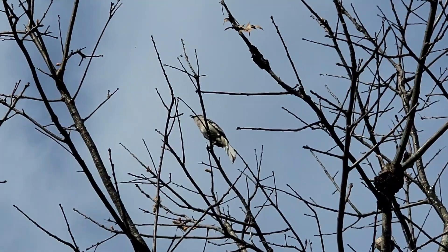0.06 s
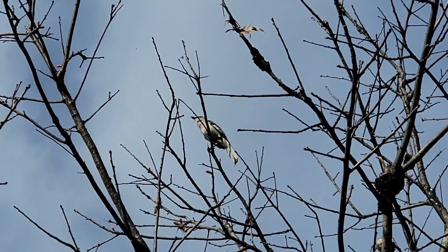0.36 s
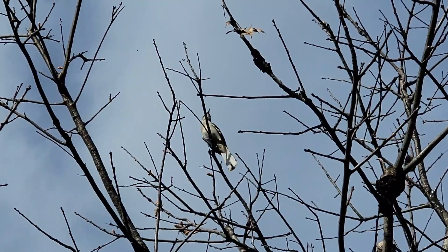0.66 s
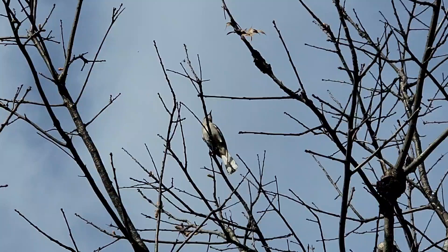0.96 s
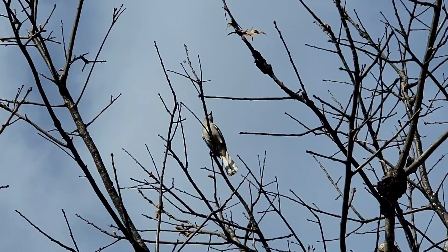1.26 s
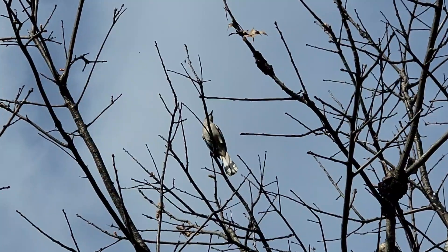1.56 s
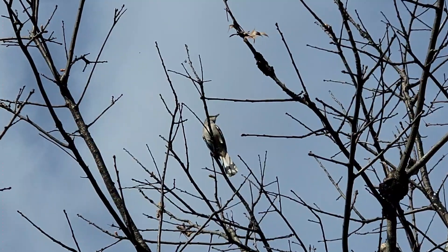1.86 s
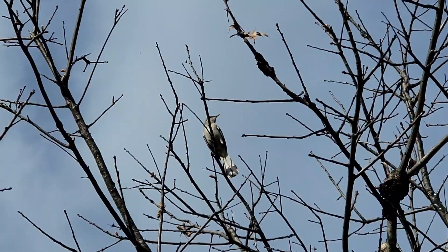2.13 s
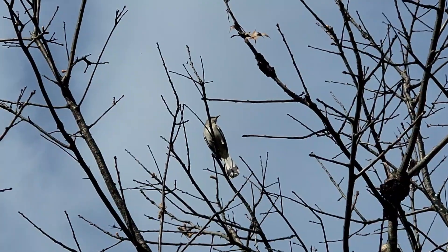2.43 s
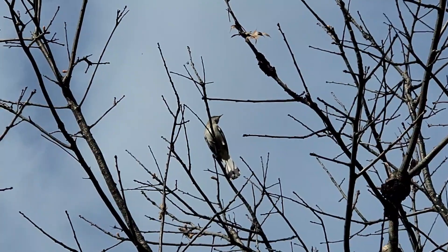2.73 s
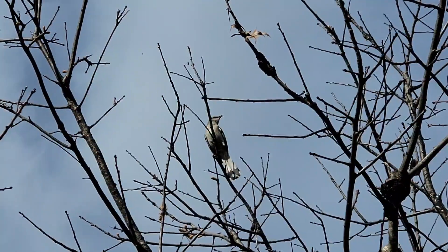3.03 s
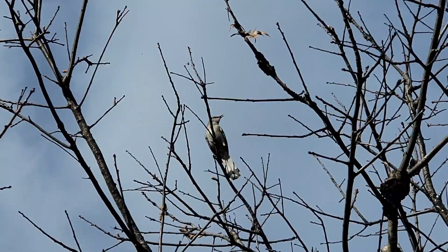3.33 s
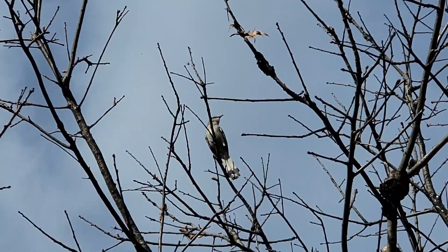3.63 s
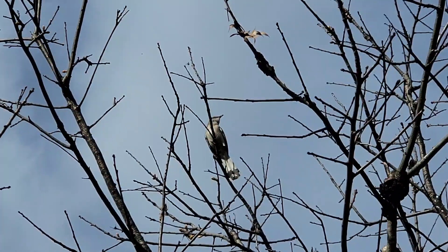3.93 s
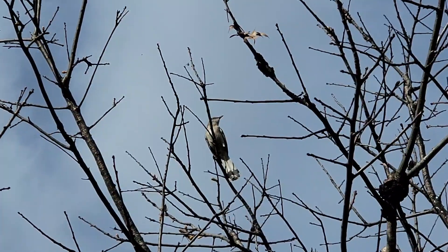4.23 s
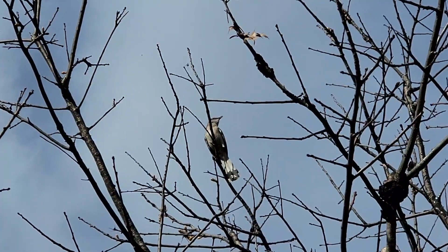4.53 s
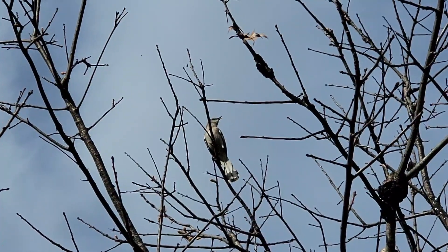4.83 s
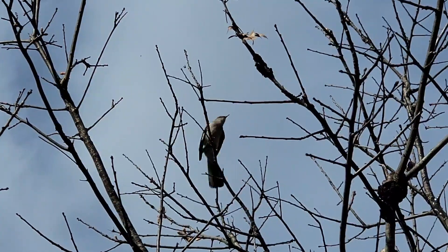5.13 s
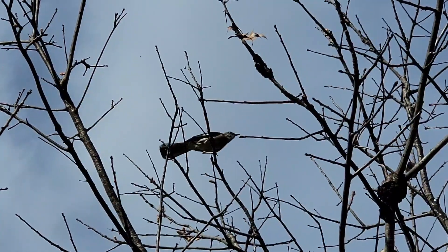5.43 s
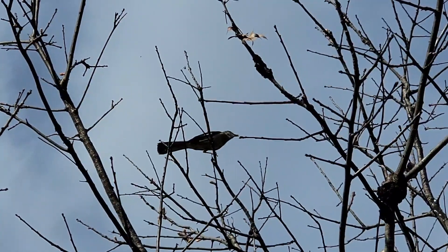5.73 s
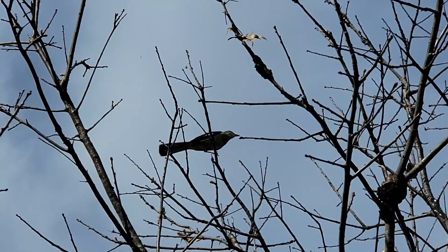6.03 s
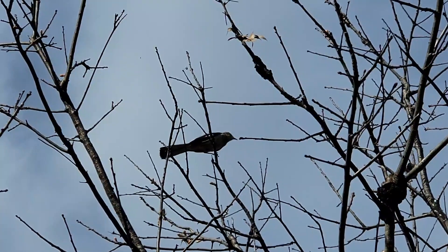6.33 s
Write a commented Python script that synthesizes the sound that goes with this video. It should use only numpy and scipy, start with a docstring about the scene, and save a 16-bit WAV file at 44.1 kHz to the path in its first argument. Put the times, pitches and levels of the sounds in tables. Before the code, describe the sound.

Outdoors, a mockingbird repeats gliding whistles and raspy chips with brief pauses, while a far bird answers above low traffic noise.

```python
"""Mockingbird in a bare tree

Close to a stereo microphone, a mockingbird sings three phrases, repeating each before the next.
Membranes in its syrinx make gliding whistles, some torn into a rasp as they turn chaotic;
a hard surface nearby throws the notes back a moment later. A second bird answers faintly
from afar, over the low rumble of distant traffic, two machine tones and a hiss of air."""
import sys
import numpy as np
from scipy import signal
from scipy.fft import rfft, irfft, next_fast_len
from scipy.io import wavfile
from scipy.ndimage import uniform_filter1d, minimum_filter1d, map_coordinates

SR = 44100
rng = np.random.default_rng(int(sys.argv[2]) if len(sys.argv) > 2 else 0)


def master(y):
    """Save y as 16-bit WAV."""
    cut = np.clip(np.atleast_2d(y).T, -1, 1)
    pcm = np.round(cut * 32767)  # scale
    wavfile.write(sys.argv[1], SR, pcm.astype(np.int16))


N = 281799

# Spectra of far traffic and open air: (frequency [Hz], relative density [dB])
TRAFFIC_SPECTRUM = [(13, -28.5), (22, -13.5), (59, 5.5), (83, 3.5), (107, 0), (145, 0), (368, -12),
                    (432, -16.5), (490, -13), (536, -11), (630, -19.5), (1080, -20), (1410, -27),
                    (1600, -45.5), (2080, -57), (3520, -120)]
AIR_SPECTRUM = [(900, -22), (1400, 1), (1700, -8), (2300, -2), (2800, -5), (3100, -3.5), (3500, -8.5),
                (4300, -8.5), (5300, -24.5), (6600, -30), (9000, -45), (11000, -43), (12200, -30.5),
                (15500, -36.5)]
# How alike that noise is at the two microphone ports: (frequency [Hz], correlation [0-1])
PORT_LIKENESS = [(60, 0.95), (130, 0.98), (290, 0.92), (640, 0.8), (1410, 0.3), (3100, 0.14), (6820, 0.03),
                 (15000, 0.02)]
# Distant machine tones: (frequency [Hz], level [dB])
MACHINE_TONES = [(438, -52.5), (545, -52)]

# The near bird's syllables, one note a row: (delay [s], length [s], pitch at start [Hz],
# at one third [Hz], at two thirds [Hz], at end [Hz], level [dB], swell [dB], attack [s],
# release [s], roughness [0-1], overtone gain [dB], even overtone gain [dB])
RISE_NOTES = [(0, 0.081, 1900, 1935, 1990, 2174, -22.5, 11, 0.024, 0.024, 0.093, -4.5, -6)]  # soft rising whistle
SWOOP_NOTES = [(.002, .034, 3985, 3346, 3110, 2840, -12.5, 0, 0.011, 0.016, .12, 3.5, -0.36),
               (.026, .1, 2884, 2673, 2437, 2060, -25.5, -9, .005, 0.046, .1, -6.5, -2)]  # loud fall that trails away
WARBLE_NOTES = [(.002, 0.057, 2846, 2882, 2560, 2400, -18.5, -5, .016, 0.011, 0.19, -1.2, -4),
                (.058, .043, 2170, 2167, 2380, 2624, -22.5, 8, .004, 0.0042, 0.17, 1.2, -6),
                (.096, .028, 2350, 1950, 1730, 1570, -29.5, -21, .004, 0.0066, 0.23, -1, 3)]  # slur down, climb, drop off
HOLD_NOTES = [(0, .074, 1680, 1660, 1660, 1675, -36.5, 3, .008, .012, .03, -16, 8)]  # quiet level tone
CREAK_NOTES = [(0.0016, .042, 1880, 2180, 2370, 2560, -26, 3.3, 0.027, 0.025, .6, 3.5, -3.1)]  # period-doubled lead-in
ARCH_NOTES = [(0.0015, 0.09, 1740, 2070, 2065, 1680, -23.5, 0, 0.027, 0.012, 0.1, -4, -1.3)]  # low rounded whistle
FLOURISH_NOTES = [(.002, .032, 3120, 3100, 3275, 3380, -19, 8, .016, 0.0062, .08, 2, -0.5),
                  (.0345, 0.027, 3710, 3133, 2832, 2670, -12.5, -9, 0.0035, .01, .2, 4, 0.5),
                  (.055, 0.12, 2124, 1910, 1888, 1802, -30.5, -10, 0.023, 0.016, 0.037, -1, -7),
                  (.177, .043, 2470, 2330, 2170, 2030, -23.5, 0, 0.011, 0.0055, 0.22, -3.5, 0.5),
                  (.221, .045, 2620, 2357, 2642, 2800, -20.5, 10, 0.0038, 0.0078, 0.37, -0.5, -1)]  # lift, whip down, low whine, dip, twirl
# When each is sung: (time [s], time stretch [ratio], pitch [ratio], gain [dB])
RISE_TIMES = [(-.0185, 0.89, 1.055, 0), (0.2958, 1.025, 1.012, 1.2), (.657, 1.174, 1.001, 0.3),
              (1.039, 1.08, 1.004, 0), (1.5473, 1.006, 1.015, 0), (1.904, 1.24, 1.007, .5)]
SWOOP_TIMES = [(0.064, 1, 1.001, .1)]
WARBLE_TIMES = [(0.407, 0.98, 0.99, 0.38), (0.7812, 0.97, .99, .1), (1.151, 0.99, 1, 0.15),
                (1.6537, 1.003, 1.01, 0.6), (2.0322, 1, 1.003, -1.1)]
HOLD_TIMES = [(0.513, 0.987, 1.001, .1)]
FLOURISH_TIMES = [(5.453, 0.94, 0.98, 0.08), (5.78, 0.99, 1, 0.41), (6.134, .99, .98, -1)]
# Arches, flatter as the phrase settles: (time [s], time stretch [ratio], height [ratio], gain [dB])
ARCH_TIMES = [(2.926, 0.87, 1.52, -.5), (3.2589, 0.99, 1.26, 0.8), (3.6153, 0.95, 0.87, -.7),
              (3.9717, 0.96, 0.96, -0.4), (4.356, 0.96, 1.03, .1), (4.738, 1.025, 0.98, .6)]
# Piercing chips: (time [s], length [s], top pitch [Hz], rasp pitch [Hz], fall time [s], level [dB])
TORN_CHIPS = [(3.084, 0.14, 3518, 2750, 0.022, -7), (3.43, 0.14, 3127, 2410, .035, -8.5),
              (3.78, 0.14, 3077, 2366, .034, -9), (4.154, 0.14, 3130, 2360, .034, -9.5),
              (4.547, 0.14, 3087, 2382, .035, -8.5), (4.929, 0.15, 3062, 2398, .036, -9)]
# The far bird's slurs: (time [s], length [s], start pitch [Hz], end pitch [Hz], level [dB])
DISTANT_SLURS = [(.248, 0.043, 3400, 2280, -42), (0.296, .045, 5160, 3000, -49),
                 (0.379, 0.035, 2700, 3100, -42), (0.884, 0.17, 5425, 5520, -71.5),
                 (1.342, 0.034, 3400, 2280, -41.5), (1.396, 0.022, 3250, 2380, -48),
                 (1.468, .08, 2430, 2226, -46), (2.534, .085, 3460, 3060, -46.5),
                 (2.683, 0.062, 2237, 2740, -46.5), (2.729, 0.067, 2310, 2395, -52),
                 (3.745, .045, 3400, 2210, -43), (4.274, .042, 3380, 2280, -38),
                 (4.327, .04, 3200, 2230, -44), (5.309, .05, 3310, 2220, -43.5),
                 (5.574, 0.034, 5250, 2960, -52), (6.067, .036, 5100, 2980, -47.5)]
# Colour of the overtones as heard, with the microphone's peak near 14 kHz and roll-off above it:
# (frequency [Hz], gain [dB])
OVERTONE_COLOUR = [(3300, -22.5), (4100, -20.5), (4900, -17), (5400, -28.5), (5900, -41.5), (6900, -34.5),
                   (8300, -45.5), (10500, -41.5), (12000, -37.5), (13300, -29.5), (14000, -24.5),
                   (14600, -37.5), (15300, -49)]

# The near bird's strength at the microphone: (frequency [Hz], left minus right [dB])
PORT_BALANCE = [(1800, 3.5), (2400, 2), (2900, -7.5), (3600, -5.5), (5000, -10.5), (8000, 7), (14000, 3)]
# Its phase at the microphone: (frequency [Hz], lead of the left port [rad])
PORT_PHASE = [(800, -.1), (2000, -.6), (2650, -1.45), (3000, -.8), (4000, 0), (4600, 1), (5500, 1.4),
              (7000, .3), (8900, .4), (10000, -.8), (11400, -1.6), (12500, .3), (15000, -.6)]
# The garden's reverberation: (frequency [Hz], time to fall 60 dB [s])
GARDEN_DECAY = [(1500, .5), (3000, 0.7), (6000, 0.37), (14000, 0.54)]


def amp(db):
    """Decibels to gain."""
    return 10 ** (np.asarray(db) / 20)


def along(points, hz):
    """Read (frequency, value) points on a log axis."""
    freqs, values = np.transpose(points)
    return np.interp(np.log(hz + 1), np.log(freqs + 1), values)


def wobble(rate, size):
    """A smooth random curve, rate knots a second."""
    knots = rng.standard_normal(int(size * rate / SR) + 4)
    return map_coordinates(knots, [np.arange(size) * rate / SR])


def filtered(x, response):
    """Pass x through a complex frequency response."""
    size = next_fast_len(N + SR // 2)
    return irfft(rfft(x, size) * response(np.fft.rfftfreq(size, 1 / SR)), size)[..., :N]


def add(out, start, sound):
    """Mix a sound into out at start seconds."""
    at = round(start * SR)
    sound = sound[:, max(-at, 0):N - at]
    out[:, max(at, 0):][:, :sound.shape[1]] += sound


def envelope(t, attack_s, release_s):
    """Rounded attack, hold, rounded release."""
    ramp = lambda u: np.sin(np.pi / 2 * np.clip(u, 0, 1))
    return ramp(t / attack_s) * ramp((t[-1] - t) / release_s) ** 2


def rush(spectrum):
    """Stereo noise of rms 1, nearly mono in the bass."""
    def mid_and_side(hz):
        spread = np.arccos(along(PORT_LIKENESS, hz)) / 2
        return amp(along(spectrum, hz)) * [np.cos(spread), np.sin(spread)]
    mid, side = filtered(rng.standard_normal((2, N)), mid_and_side)
    noise = np.array([mid + side, mid - side])
    return noise / np.sqrt(np.mean(noise ** 2))


def traffic(level_db=-34.5, fade_db_per_s=.15):
    """Far-off traffic: a low rumble that slowly recedes."""
    receding_db = level_db - fade_db_per_s * np.arange(N) / SR
    return amp(receding_db + .6 * wobble(6, N)) * rush(TRAFFIC_SPECTRUM)


def machines(waver_hz=4, swell_db=1.8):
    """Two distant machine tones, wavering in pitch and level."""
    out = np.zeros(N)
    for hz, db in MACHINE_TONES:
        gain = amp(db + swell_db * wobble(6, N))
        pitch = hz + waver_hz * wobble(25, N)
        out += gain * np.sin(2 * np.pi * np.cumsum(pitch) / SR)
    return out


def syrinx(pitch, rough, even_db, split, flutter_hz=78, taut_hz=2520):
    """Rows (fundamental, overtones) of a membrane that flutters and turns chaotic as it gets rough."""
    size = len(pitch)
    flutter_rate = flutter_hz * np.exp(.17 * wobble(60, size))
    flutter = np.sin(2 * np.pi * np.cumsum(flutter_rate) / SR)
    swing = rough ** 1.22 * (.059 * flutter + .0846 * wobble(1100, size))
    phase = 2 * np.pi * np.cumsum(pitch * (1 + swing)) / SR
    tone = np.sin(phase) + split * np.sin(3 * phase / 2)  # split: period doubling
    pulse_db = 5 * rough * flutter
    overtones = amp(4.5 + pulse_db) * rough * rng.standard_normal(size)  # air rushing past the membrane
    rolloff_db = 6 * np.maximum(pitch - taut_hz, 0) / 1000  # per harmonic: high notes are rounder
    for k in range(2, 9):
        # the windpipe, closed at one end, sets even harmonics apart; each harmonic swells on its own
        swell_db = 3.5 * wobble(45, size)
        db = even_db * (k % 2 == 0) + swell_db + pulse_db - rolloff_db * (k - 2)
        fray = 1 + amp(-12) * wobble(1800, size)
        overtones += amp(db) * fray * np.sin(k * phase) * (k * pitch < SR / 2)
    shimmer = amp(1.5 * rough * wobble(695, size))
    return np.sqrt(2) * np.array([tone, overtones]) * shimmer


def whistle(t, pitch, gain, rough, bright_db, even_db, split=0, bloom_s=.01, pure_above_db=-26.5):
    """One note: it starts pure, its overtones bloom, and it grows purer again where it is loud."""
    tone, overtones = syrinx(pitch, rough, even_db, split)
    bloom = 1 - np.exp(-(t / bloom_s) ** 2)
    excess_db = np.maximum(20 * np.log10(gain + 1e-9) - pure_above_db, 0)
    return gain * np.array([tone, overtones * bloom * amp(bright_db - .24 * excess_db)])


def sing(syllable, renditions, split=0, bloom_s=.004, build_db=0, height=1):
    """Repeat a syllable at varying speed, pitch and strength; overtones gain build_db each repeat."""
    out = np.zeros((2, N))
    for repeat, (start, stretch, ratio, gain_db) in enumerate(renditions):
        for delay, length, *hz, db, swell_db, attack, release, rough, bright_db, even_db in syllable:
            t = np.arange(int(length * stretch * SR)) / SR
            progress = t / t[-1]
            contour = np.polyfit(np.linspace(0, 1, len(hz)), hz, len(hz) - 1)
            glide = np.polyval(contour, progress)
            pitch = ratio * (hz[-1] + height * (glide - hz[-1]))
            gain = amp(db + gain_db + swell_db * (progress - .5))
            gain *= envelope(t, attack * stretch, release * stretch)
            note = whistle(t, pitch, gain, rough, bright_db + build_db * repeat, even_db, split, bloom_s)
            add(out, start + delay * stretch, note)
    return out


def voice_colour(voice, low_cut_hz=1600):
    """The throat passes the fundamental above a low cut; overtones are coloured as the mic hears them."""
    tone, overtones = voice
    tone = filtered(tone, lambda hz: 1 - 1 / (1 + (hz / low_cut_hz) ** 20))
    return tone + filtered(overtones, lambda hz: amp(along(OVERTONE_COLOUR, hz)))


def warbles():
    """Opening phrase: rising whistles lead into one swoop, then into ever harsher warbles."""
    return (sing(RISE_NOTES, RISE_TIMES, bloom_s=.031) + sing(SWOOP_NOTES, SWOOP_TIMES)
            + sing(WARBLE_NOTES, WARBLE_TIMES, build_db=.9) + sing(HOLD_NOTES, HOLD_TIMES))


def ports(x):
    """The song reaches the two microphone ports with different strength and phase."""
    half = np.array([[1], [-1]]) / 2
    balance = lambda hz: amp(half * along(PORT_BALANCE, hz))
    return filtered(x, lambda hz: balance(hz) * np.exp(1j * half * along(PORT_PHASE, hz)))


def twigs(x, level_db=-.5, t60=.03, corner_hz=5000):
    """Thin twigs around the perch scatter mostly treble, differently towards each port."""
    t = np.arange(SR // 10) / SR
    impulse = rng.standard_normal((2, len(t))) * amp(-60 * t / t60)
    scattered = signal.fftconvolve(x[None], impulse / np.linalg.norm(impulse[0]), axes=1)[:, :N]
    return amp(level_db) * filtered(scattered, lambda hz: 1 - 1 / (1 + (hz / corner_hz) ** 4))


def slap(x, strength=.37, delay_s=.01038):
    """A strong reflection off a hard surface nearby beats against every glide and makes it ripple."""
    # a weaker reflection reaches each port at its own time
    weak, weak_delay_s = np.array([[.1], [.17]]), np.array([[.01182], [.01097]])
    late = lambda hz, s: np.exp(-2j * np.pi * hz * s)
    return filtered(x, lambda hz: 1 - strength * late(hz, delay_s) - weak * late(hz, weak_delay_s))


def echo(x, delay_s=.067, level_db=-27, corner_hz=4000):
    """A more distant surface returns one faint, dull copy."""
    late_and_dull = lambda hz: np.exp(-2j * np.pi * hz * delay_s) / (1 + (hz / corner_hz) ** 4)
    return amp(level_db) * filtered(x, late_and_dull)


def garden(x, scatter_db, tail_db, scatter_t60=.069):
    """Branches scatter the song at once; the surroundings add a fainter, longer tail."""
    hz, t, noise = signal.stft(rng.standard_normal((2, SR // 2)), SR, nperseg=256)
    decay = amp(-60 * t / along(GARDEN_DECAY, hz)[:, None])
    tail = signal.istft(noise * decay, SR, nperseg=256)[1]
    t = np.arange(tail.shape[1]) / SR
    tail *= 1 - np.exp(-t / .036)
    scatter = rng.standard_normal(tail.shape) * amp(-60 * t / scatter_t60) * (1 - np.exp(-t / .017))
    impulse = amp(scatter_db) * scatter / np.linalg.norm(scatter[0])
    impulse += amp(tail_db) * tail / np.linalg.norm(tail[0])
    return signal.fftconvolve(x[None], impulse, axes=1)[:, :N]


def far_bird():
    """Short dull slurs from a distant tree, each easing from one pitch to another."""
    out = np.zeros((2, N))
    for start, length, start_hz, end_hz, db in DISTANT_SLURS:
        t = np.arange(int(length * SR)) / SR
        pitch = start_hz + (end_hz - start_hz) * np.sin(np.pi / 2 * t / length) ** 2
        gain = amp(db) * envelope(t, .51 * length, .31 * length)
        add(out, start, whistle(t, pitch, gain, rough=.11, bright_db=-15.5, even_db=.5))
    return voice_colour(out)


def arches(arch_delay_s=.022):
    """Second phrase: each short, period-doubled creak opens into a rounded whistle."""
    out = np.zeros((2, N))
    for start, stretch, height, db in ARCH_TIMES:
        out += sing(CREAK_NOTES, [(start, 1, 1, db)], split=.32)
        out += sing(ARCH_NOTES, [(start + arch_delay_s, stretch, 1, db)], height=height)
    return out


def chips(tear_s=.026, tear_width_s=.0022, rasp_db=-14.5, sag_db_per_s=52):
    """After each arch a pure whistle swells until it tears, sinks in pitch and fades as a rasp."""
    out = np.zeros((2, N))
    for start, length, top_hz, rasp_hz, fall_s, db in TORN_CHIPS:
        t = np.arange(int(length * SR)) / SR
        pitch = rasp_hz + (top_hz - rasp_hz) * np.exp(-(t / fall_s) ** 3)
        torn = 1 / (1 + np.exp((tear_s - t) / tear_width_s))
        rasp_gain = amp(rasp_db - sag_db_per_s * (t - tear_s))
        strength = (1 - torn) * t / tear_s + torn * rasp_gain
        gain = amp(db) * strength * envelope(t, attack_s=.002, release_s=.023)
        rough = .037 * (1 - torn) + .82 * torn
        even_db = 6 * (.5 - torn)  # even overtones stand out until the tear
        add(out, start, whistle(t, pitch, gain, rough, bright_db=-.5, even_db=even_db))
    return out


def flourishes():
    """Closing phrase: a quick run of five gliding notes, sung three times."""
    return sing(FLOURISH_NOTES, FLOURISH_TIMES, bloom_s=.0073)


def scene():
    """At the microphone the near bird is mostly direct sound; the far one has more garden in it."""
    mockingbird = voice_colour(warbles() + arches() + chips() + flourishes())
    far = far_bird()
    song = ports(slap(mockingbird)) + twigs(mockingbird) + echo(mockingbird)
    song += garden(mockingbird, scatter_db=-10.5, tail_db=-24.5)
    answer = far + garden(far, scatter_db=-2, tail_db=-5)
    rumble = (traffic() + machines()) * amp([[-.4], [.4]])  # a touch to the right
    air = amp(-55) * rush(AIR_SPECTRUM)
    return song + answer + rumble + air


def record(dry):
    """The recorder limits the loudest chips and keeps nothing above its band limit."""
    ceiling, window, top_hz = .88, SR // 100, 15700
    needed = np.minimum(1, ceiling / (np.abs(dry).max(axis=0) + 1e-9))
    gain = uniform_filter1d(minimum_filter1d(needed, size=window), size=window)
    return filtered(dry * gain, lambda hz: hz < top_hz)


dry = scene()
out = record(dry)
master(out)
```